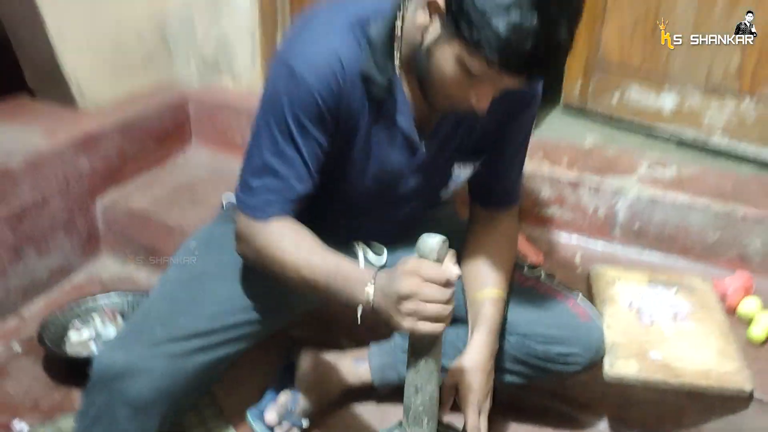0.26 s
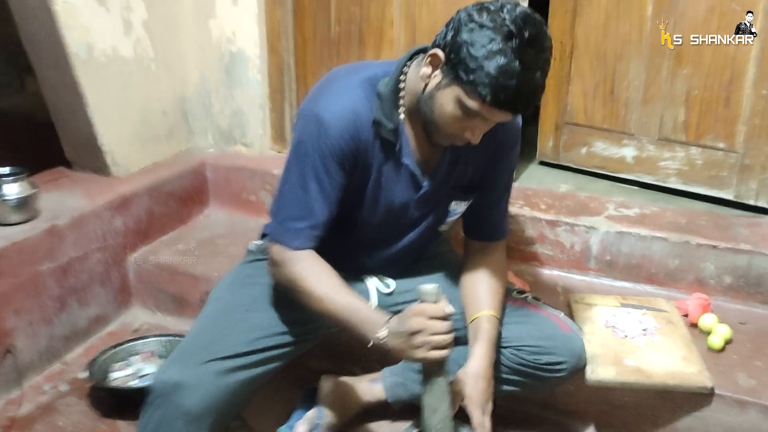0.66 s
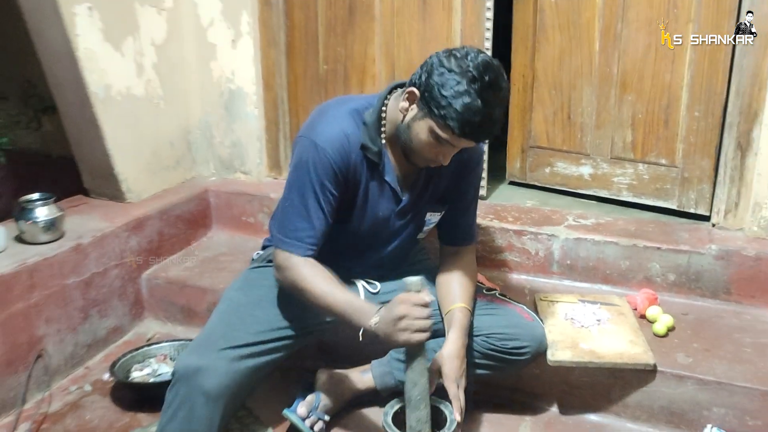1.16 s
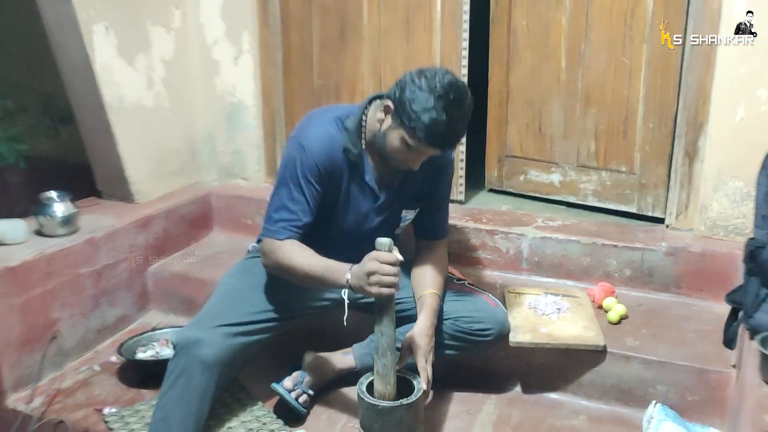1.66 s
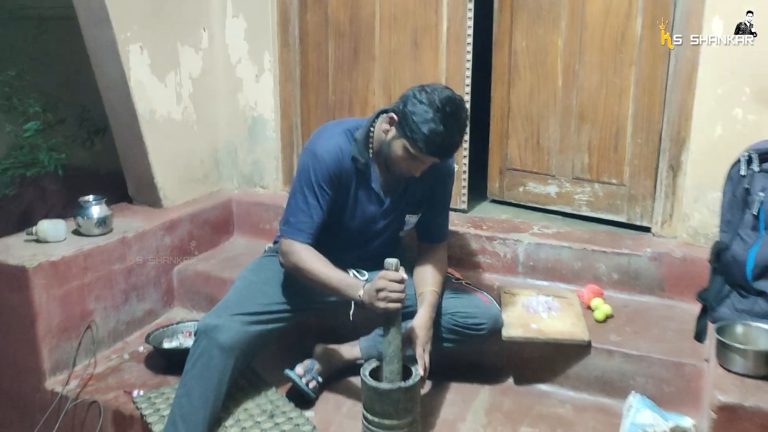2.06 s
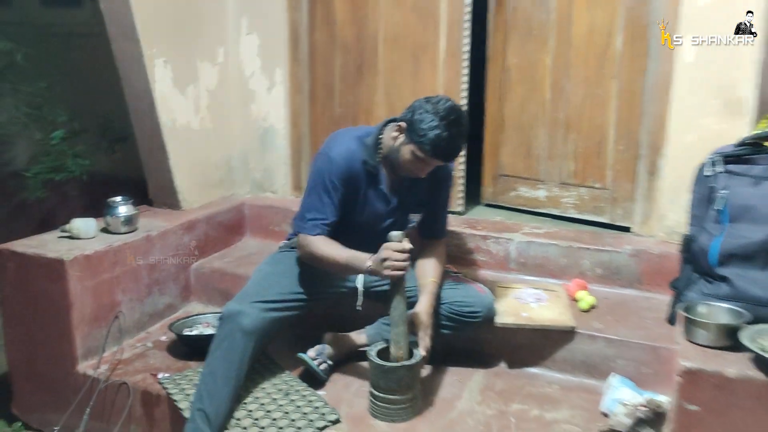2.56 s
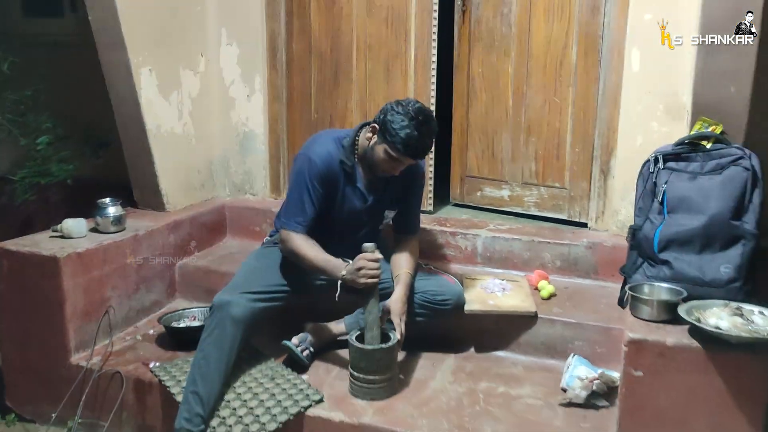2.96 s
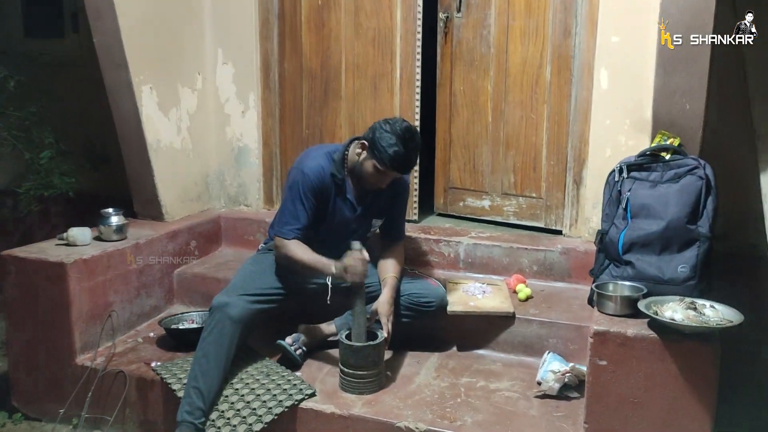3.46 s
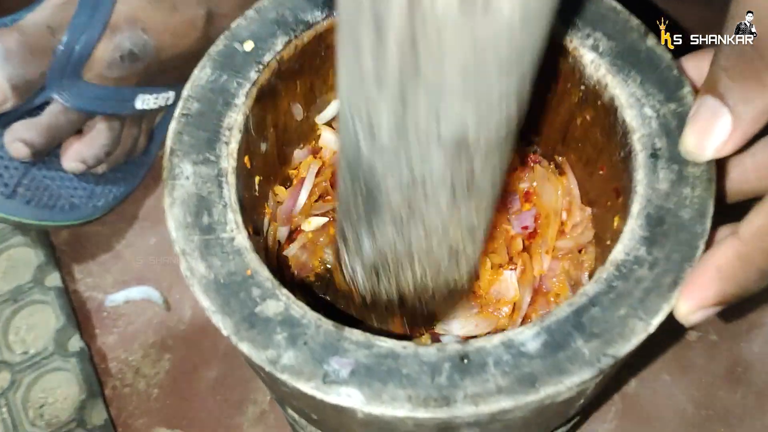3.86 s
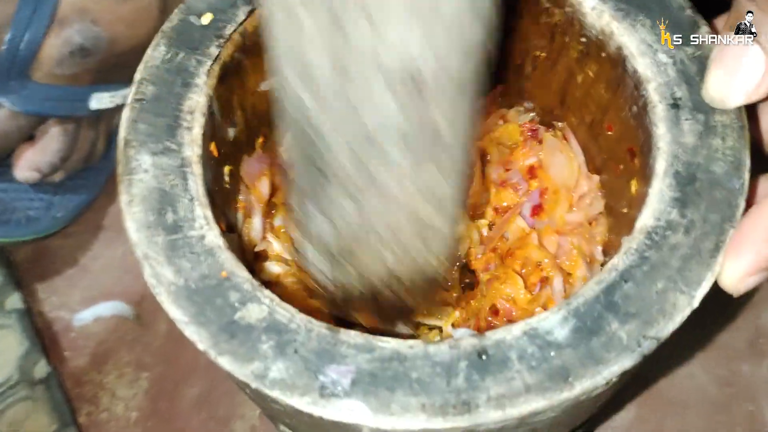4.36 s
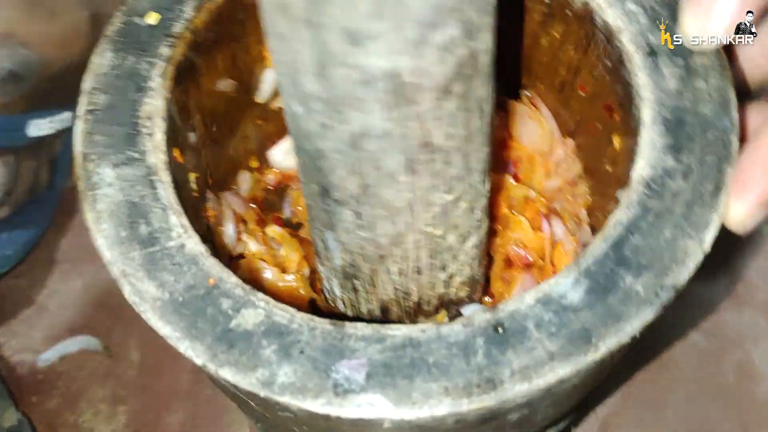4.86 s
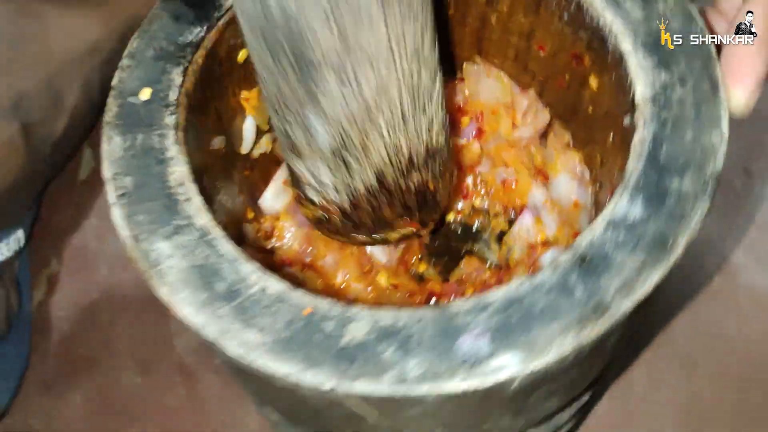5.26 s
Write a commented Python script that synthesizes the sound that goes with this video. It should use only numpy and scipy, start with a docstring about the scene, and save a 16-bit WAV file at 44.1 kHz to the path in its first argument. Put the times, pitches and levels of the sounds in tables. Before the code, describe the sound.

Steady hollow knocks and wet splats of a pestle in a mortar outdoors at night, breaking off briefly and resuming closer and drier.

```python
"""A wooden pestle pounds chillies and onion in a heavy mortar on a doorstep at night, among insects. At first
it is a few steps off: each impact excites the air resonance of the bowl, thumps the step and splats the paste,
and the porch reverberates. Then the scene changes and the blows are right at the bowl, drier and more damped,
with juice squeezed out and faint squeaks between them. Last, the pestle is dragged hard through the paste."""
import sys
import numpy as np
from scipy import signal
from scipy.fft import rfft, irfft
from scipy.io import wavfile
from scipy.ndimage import uniform_filter1d, minimum_filter1d

SR = 44100
rng = np.random.default_rng(int(sys.argv[2]) if len(sys.argv) > 2 else 0)


def wav_out(sig):
    """Save sig, one row per channel (or a flat mono array), as 16-bit PCM at SR to the path in sys.argv[1]."""
    wavfile.write(sys.argv[1], SR, np.round(np.clip(np.atleast_2d(sig).T, -1, 1) * 32767).astype(np.int16))


N = 242991
TIME = np.arange(N) / SR
FAR_UNTIL_S, NEAR_FROM_S = 3.664, 3.91


def amp(db):
    """Amplitude ratio of a level in decibels."""
    return 10 ** (np.asarray(db) / 20)


def unit_rms(x):
    """Normalisation to rms 1."""
    return x / np.sqrt(np.mean(x ** 2) + 1e-20)


def curve_at(points, hz):
    """Interpolation on a logarithmic frequency axis."""
    f, value = np.transpose(points)
    return np.interp(np.log(hz + 1), np.log(f), value)


def add(mix, s, sound):
    """Superposition of a sound on the mix at time s."""
    part = mix[:, max(round(s * SR), 0):][:, :sound.shape[-1]]
    part += sound[..., :part.shape[-1]]


def colour(x, points):
    """Zero-phase filtering by a curve of (f/Hz, gain/dB)."""
    return irfft(rfft(x) * amp(curve_at(points, np.fft.rfftfreq(x.shape[-1], 1 / SR))), x.shape[-1])


def gate(start, end, ramp_s):
    """Trapezoidal envelope."""
    return np.clip(np.minimum(TIME - start, end - TIME) / ramp_s, 0, 1)


def band_noise(hz, width_hz):
    """Narrow-band noise, heard as a fuzzy note."""
    f = np.fft.rfftfreq(N, 1 / SR)
    return unit_rms(irfft(rfft(rng.standard_normal((2, N))) / (1 + (2 * (f - hz) / width_hz) ** 4), N))


# likeness of the two channels: f/Hz, coherence
COHERENCE = [(30, 0.6), (130, 0.98), (300, 0.95), (700, 0.69), (1200, 0.4), (2500, 0.04), (5000, 0),
             (15000, 0)]
def diffuse(x):
    """Partial coherence: two independent channels come to share their bass while the treble stays wide."""
    angle = np.arccos(np.clip(curve_at(COHERENCE, np.fft.rfftfreq(x.shape[-1], 1 / SR)), 0, 1)) / 2
    mid, side = rfft(x) * np.array([np.cos(angle), np.sin(angle)])
    return irfft(np.array([mid + side, mid - side]), x.shape[-1])


# spectrum of still air: f/Hz, relative density/dB
AIR_SPECTRUM = [(25, 19), (55, 0.5), (100, 16), (160, 12), (350, 6), (700, -2.5), (1200, -7.5), (2500, -7),
                (5500, -12.5), (8500, -8.5), (11000, -14), (15000, -13.5)]
def night_air(level_db=-50.5):
    """Stationary ambient noise, strongest in the bass."""
    return amp(level_db) * unit_rms(diffuse(colour(rng.standard_normal((2, N)), AIR_SPECTRUM)))


# cricket trills: start t/s, end t/s, f/Hz, bandwidth/Hz, level/dB, pulse rate/Hz
TRILLS = [(0, .45, 7000, 500, -68, 9), (.7, 3.6, 7850, 300, -72.5, 3.4), (0, 2.1, 8700, 807, -66, 1.7),
          (1.65, 2.2, 9200, 800, -67, 17), (3.15, 3.45, 9440, 350, -67, 42),
          (3.85, 5.15, 5430, 260, -58, 52)]
def crickets():
    """Amplitude modulation of a narrow band makes each trill."""
    out = np.zeros((2, N))
    for start, end, hz, width_hz, db, pulse_hz in TRILLS:
        pulses = unit_rms(2.5 + np.sin(2 * np.pi * (pulse_hz * TIME + rng.random())))
        out += amp(db) * pulses * band_noise(hz, width_hz) * gate(start, end, ramp_s=0.028)
    return out


# first rasp of each call: t/s
CALLS = [.36, .61, 1.65, 2.38, 2.65, 2.95]
def bush_cricket(gap_s=0.073, half_width_s=0.032, left_db=-59, right_db=-69):
    """Paired Gaussian pulses of high noise, placed to the left by a level difference."""
    rasps = sum(np.exp(-((TIME - s - lag) / half_width_s) ** 2) for s in CALLS for lag in (0, gap_s))
    return amp([[left_db], [right_db]]) * rasps * band_noise(12910, width_hz=1800)


# faint squeaks between blows: centre t/s, duration/s, f/Hz, level/dB
SQUEAK_NOTES = [(4.452, 0.043, 1170, -54), (4.52, 0.12, 1187, -58), (4.86, 0.029, 1250, -42)]
def squeaks():
    """Narrow-band noise under a Gaussian envelope gives short, soft notes."""
    return sum(amp(db) * band_noise(hz, width_hz=220) * np.exp(-(2 * (TIME - s) / length) ** 2)
               for s, length, hz, db in SQUEAK_NOTES)


# small sharp ticks: t/s, level before filtering/dB, left minus right/dB
TICK_EVENTS = [(.053, -39, -7.5), (.237, -50, -10.5), (.543, -60, -4), (1.072, -44, 0), (1.826, -42, -10),
               (1.945, -40, -28), (4.273, -43.5, 6), (4.5, -38, -1), (4.581, -41, -8), (4.665, -41, -2),
               (4.944, -34.5, -3), (5.447, -38, 7)]
def ticks(decay_s=0.0015):
    """Broadband transients, heard as thin, dry clicks."""
    out, t = np.zeros((2, N)), np.arange(SR // 50) / SR
    for s, db, pan_db in TICK_EVENTS:
        gains = amp(db + np.array([[pan_db], [-pan_db]]) / 2)
        add(out, s, gains * rng.standard_normal((2, len(t))) * np.exp(-t / decay_s))
    return colour(out, [(150, 3), (1000, 8), (4000, 9), (9000, 8), (15000, 6)])


# echoes from steps and walls: delay t/s, level before filtering/dB
REFLECTIONS = [(.0157, -20), (.0243, -17.5), (.0335, -19), (.0515, -23), (.058, -26), (.108, -30),
               (.147, -32)]
# reverberation time of the porch: f/Hz, T60/s
PORCH_T60 = [(100, 1), (250, 0.67), (700, 1), (2800, 0.7), (4200, 0.35), (14000, 0.084)]
def porch(x, tail_db):
    """Convolution with discrete echoes and a diffuse tail in which each band decays at its own rate."""
    hz, t, noise = signal.stft(rng.standard_normal((2, SR)), SR, nperseg=256)
    envelope = amp(-60 * t / curve_at(PORCH_T60, hz)[:, None]) * (1 - np.exp(-t / 0.023))
    tail = signal.istft(noise * envelope, SR, nperseg=256)[1]
    tail = colour(diffuse(tail / np.linalg.norm(tail[0])),
                  [(150, -5), (350, 1), (700, -11.5), (1200, -1.5), (2600, 4.5), (5000, 5.5), (14000, 4.5)])
    walls = np.zeros_like(tail)
    for delay, db in REFLECTIONS:
        add(walls, delay, amp(db) * np.ones((2, 1)))
    walls = colour(walls, [(200, 5), (900, -5), (3000, -12.5), (10000, -2)])
    return signal.fftconvolve(x, walls + amp(tail_db) * tail, axes=1)[:, :N]


def scattered(x, t, wet_db, fade_s):
    """Scattering by ground, legs and steps adds dense early reflections; rms 1 over the first 40 ms."""
    taps = diffuse(rng.standard_normal((2, len(t))) * np.exp(-t / fade_s) * (1 - np.exp(-t / 0.0079)))
    y = x + amp(wet_db) * signal.fftconvolve(x, taps / np.linalg.norm(taps[0]), axes=1)[:, :len(t)]
    return y / np.sqrt(np.mean(y[:, :SR // 25] ** 2))


def crackle(envelope, spectrum, per_s, spread_db):
    """Shot noise of tiny wet bursts; the envelope sets its amplitude in the treble."""
    sizes = amp(spread_db * np.minimum(rng.exponential(1, N), 4))
    occurs = rng.random(N) < per_s / SR
    bursts = unit_rms(sizes * occurs * rng.standard_normal((2, N)))
    treble_power = np.mean(amp(curve_at(spectrum, np.linspace(4500, 15000, 50))) ** 2) * 10500 / (SR / 2)
    return diffuse(colour(bursts * envelope, spectrum)) / np.sqrt(treble_power)


# strokes through the paste: start t/s, end t/s, treble level/dB
DRAGS = [(-0.04, 0.099, -51.5), (0.394, 0.607, -50), (0.854, 1.025, -46), (1.415, 1.556, -53),
         (1.877, 2.146, -52.5), (2.963, 3.056, -52), (3.507, 3.607, -51), (5.079, 5.316, -39.5),
         (5.275, 5.54, -52), (5.479, 5.6, -23)]
# spectrum of dragged paste: f/Hz, relative density/dB
DRAG_SPECTRUM = [(150, 10.5), (700, 6.5), (1400, 4.5), (1900, 10), (2500, 13), (4200, 8.5), (5800, 1.5),
                 (8500, 8.5), (11000, 3.5), (15000, 1)]
def dragging(clump_db=1.4):
    """Granular friction: the paste rasps in clumps as the pestle is dragged through it."""
    strokes = sum(amp(db) * gate(start, end, ramp_s=0.065) for start, end, db in DRAGS)
    clumps = amp(clump_db * unit_rms(uniform_filter1d(rng.standard_normal(N), size=300)))
    return crackle(strokes * clumps, DRAG_SPECTRUM, per_s=6000, spread_db=2.5)


def surge(s, db, swell_s, fade_s):
    """Exponential growth up to time s and exponential decay after it."""
    return amp(db) * np.exp(-np.maximum((s - TIME) / swell_s, (TIME - s) / fade_s))


# the pestle sinks into a thick lump: t/s, peak treble level/dB
JUICE_SQUEEZES = [(4.102, -25.5), (4.251, -49.5), (4.34, -34.5), (4.611, -29.5), (4.872, -28.5),
                  (5.38, -33.5)]
# spectra of a splat, far and near: f/Hz, relative density/dB
FAR_SPLAT = [(150, -0.5), (600, 29.5), (1300, 6.5), (2500, -2), (4000, 10), (5600, -3), (8500, 3),
             (11000, -0.5), (15000, 3)]
NEAR_SPLAT = [(150, 14.5), (400, -0.5), (750, 26.5), (1250, -8), (1700, 12), (2200, 8), (3000, 15.5),
              (5500, 5.5), (8500, 10.5), (11000, 5.5), (15000, 0.5)]
def splats(blows):
    """Compression expels juice from the skins: a splat at each blow, dry and short near the bowl."""
    far = sum(surge(s, db, swell_s=0.0024, fade_s=0.018) for s, *_, db in blows if s < FAR_UNTIL_S)
    near = sum(surge(s, db, swell_s=0.0015, fade_s=0.0051) for s, *_, db in blows if s > FAR_UNTIL_S)
    juice = sum(surge(s, db, swell_s=0.0067, fade_s=0.013) for s, db in JUICE_SQUEEZES)
    return (crackle(far, FAR_SPLAT, per_s=14000, spread_db=-0.2)
            + crackle(near + juice, NEAR_SPLAT, per_s=8300, spread_db=4))


def ring(modes, t, skew_rad):
    """Damped modes, detuned by where the blow lands, reach the two channels out of phase."""
    hz, db, t60 = np.transpose(modes)[:, :, None]
    detune, skew = rng.standard_normal((2, len(modes), 1))
    phase = 2 * np.pi * hz * (1 + 0.012 * detune) * t
    decay = amp(db - 60 * t / t60)
    return np.array([(decay * np.sin(phase + sign * skew_rad * np.tanh(skew))).sum(0) for sign in (1, -1)])


# spectrum of the mortar on the step, from afar: f/Hz, relative density/dB
STEP_SPECTRUM = [(45, -53.5), (75, -25.5), (100, -14), (140, -10.5), (175, -3.5), (205, 4), (250, 1.5),
                 (340, -2), (450, -3.5), (600, -12.5), (1000, -16), (2000, -72.5)]
def step_thump(t, far):
    """Heavily damped impact of mortar on step: low noise, higher and shorter from close by."""
    spectrum = [(f * (1 if far else 1.15), db) for f, db in STEP_SPECTRUM]
    rumble = diffuse(colour(rng.standard_normal((2, len(t))), spectrum))
    envelope = (1 - np.exp(-t / 0.0023)) * np.exp(-t / (0.017 if far else 0.011))
    return scattered(rumble * envelope, t, wet_db=-20.5, fade_s=0.045)


# modes of the pestle against the mortar wall: f/Hz, relative level/dB, T60/s
CONTACT_MODES = [(1112, 1.5, 0.034), (1290, -2, 0.027), (1578, -3, 0.026), (1699, 1, 0.02),
                 (1900, -17, 0.012), (2303, -2.5, 0.028), (2775, -8.5, 0.051), (2847, -9, 0.024),
                 (3830, -5.5, 0.026), (3970, -12, 0.016), (4200, -42, 0.0051)]
def pestle_clack(t, far, favoured_hz, boost_db=7):
    """Modal excitation of wood on stone: seeds and grit break the contact into tiny impacts."""
    grit_decay = np.exp(-t / 0.0081) + amp(-11 if far else -18) * np.exp(-t / 0.019)
    grit = rng.standard_normal((1, len(t))) * grit_decay
    modes = [(f, db + boost_db * np.exp(-(np.log(f / favoured_hz) / 0.14) ** 2), t60)
             for f, db, t60 in CONTACT_MODES]
    wood = signal.fftconvolve(grit, ring(modes, t, skew_rad=1.05), axes=1)[:, :len(t)]
    noise = colour(rng.standard_normal((2, len(t))),
                   [(400, -7), (1100, 10), (2900, 8), (4300, -11), (6000, -47.5), (15000, -37)])
    crack = diffuse(noise) * np.exp(-t / 0.0092)
    return scattered(unit_rms(wood) + amp(-3) * unit_rms(crack), t, wet_db=-2 if far else -6, fade_s=0.02)


# air modes of the bowl: multiple of its pitch, relative level/dB, share of its T60
CAVITY_MODES = [(1.003, 3, 0.79), (0.828, -4, 0.69), (0.929, -6.5, 1), (1.1, -6, 0.83), (1.25, -11.5, 0.59),
                (1.451, -9.5, 0.6)]
def bowl_knock(t, far, hz, clack_db, usual_clack_db=-21.5, doubling_db=22):
    """Cavity resonance: the air in the bowl rings, longer after a bare contact than a cushioned one."""
    t60 = (0.088 if far else 0.034) * 2 ** ((clack_db - usual_clack_db) / doubling_db)
    modes = [(hz * ratio, db, t60 * share) for ratio, db, share in CAVITY_MODES]
    cushion = 1 - np.exp(-t / 0.0025)  # the paste softens the contact
    hollow = cushion * ring(modes, t, skew_rad=0.38)
    if not far:  # close by, the knock is slightly duller, softened above 1 kHz
        hollow = signal.sosfilt(signal.butter(4, 1000, fs=SR, output="sos"), hollow)
    return scattered(hollow, t, wet_db=-10 if far else -14, fade_s=0.018)


# blows: t/s, knock level/dB, thump re knock/dB, nominal clack re knock/dB, bowl f/Hz, splat level/dB
PESTLE_BLOWS = [(.006, -40.5, -10.5, -3, 619, -59), (.131, -27.5, -7, -13.5, 664, -53),
                (.181, -16.5, -17.5, -17.5, 675, -49), (.398, -46.5, -4, -14.5, 645, -59),
                (.466, -27.5, -9, -20, 686, -37), (.688, -23, -11.5, -11.5, 665, -67),
                (.7004, -21, -46, -40, 652, -66.5), (.734, -20.5, -8, -27.5, 714, -33),
                (.962, -29, -10.5, -18.5, 668, -54.5), (1.0153, -18, -9, -18.5, 709, -36.5),
                (1.3006, -16, -10, -13.5, 719, -45), (1.586, -21.5, -6.5, -17.5, 678.3, -36),
                (1.8832, -16.5, -13.5, -15.5, 708, -40), (2.179, -14, -17.5, -18, 711, -55.5),
                (2.4697, -13.5, -16, -12.5, 719.3, -58), (2.7645, -26.5, -11, -21.5, 699, -42),
                (3.058, -21, -4, -17.5, 711, -43), (3.3479, -17.5, -11, -12, 730, -47.5),
                (3.6245, -15, -17, -14.5, 711.5, -60), (4.0613, -30.5, -8, -12.5, 682, -39),
                (4.112, -21, -9, -16.5, 721, -37), (4.348, -23, -7.5, -26, 772, -45),
                (4.365, -34, -2, -40, 680, -72), (4.608, -27.5, -3, -19, 708, -36.5),
                (4.6256, -23, -7.5, -32, 673, -48), (4.8113, -26, -7.5, -26, 598, -45.5),
                (4.872, -35, -4, -11, 620, -46), (5.0612, -17.5, -14.5, -26.5, 652, -37),
                (5.137, -34, -7, -17, 790, -47), (5.374, -17.5, -4, -20, 673, -24)]
def pounding(clack_lift_db=1):
    """Impact excitation: each blow drives bowl, step and pestle at once, over the sounds of the paste."""
    out = splats(PESTLE_BLOWS) + dragging()
    t = np.arange(SR // 4) / SR
    for s, knock_db, thump_db, clack_db, hz, _ in PESTLE_BLOWS:
        far = s < FAR_UNTIL_S
        favoured_hz = 1400 * (2400 / 1400) ** rng.random()  # the landing point favours one clack mode
        knock = bowl_knock(t, far, hz, clack_db)
        thump = amp(thump_db) * step_thump(t, far)
        clack = amp(clack_db + clack_lift_db) * pestle_clack(t, far, favoured_hz)
        add(out, s, amp(knock_db) * (knock + thump + clack))
    return out


def scene():
    """Direct plus reverberant sound: the reverberant share falls once the listener is at the bowl."""
    mortar = pounding()
    far = TIME < FAR_UNTIL_S
    # successive far blows take turns among four random porch tails, so the reverberation has no fixed tone
    turn = np.searchsorted([s for s, *_ in PESTLE_BLOWS], TIME + 0.01) % 4
    far_reverb = sum(porch(mortar * far * (turn == k), tail_db=-23) for k in np.unique(turn))
    near_reverb = amp(-7.5) * porch(mortar * ~far, tail_db=-23.5)
    pounded = mortar + far_reverb + near_reverb
    return pounded + ticks() + squeaks() + night_air() + crickets() + bush_cricket()


def limiter(x, ceiling_db=-6, recovery_db_per_s=299):
    """Peak limiting: the gain drops for the hardest blows and recovers quickly."""
    over_db = np.maximum(20 * np.log10(abs(x).max(0) + 1e-9) - ceiling_db, 0)
    recovery_db = TIME * recovery_db_per_s
    gain_db = recovery_db - np.maximum.accumulate(over_db + recovery_db)
    return x * amp(uniform_filter1d(minimum_filter1d(gain_db, size=65), size=65))


# unequal response of the two microphones: f/Hz, left minus right/dB
MIC_BALANCE = [(100, -0.5), (700, 0), (1200, -1), (2200, 0), (6500, 4.5), (7800, 0), (8900, -9), (9900, -7),
               (11300, 1.5), (14500, 4.5)]
def record(dry, low_hz=80, high_hz=15600, fade_in_s=0.13):
    """Signal chain: bass cut, a silent break with a fade back in, microphone colour, limiter, low-pass."""
    thinned = signal.sosfilt(signal.butter(3, low_hz, "highpass", fs=SR, output="sos"), dry)
    gain = (TIME < FAR_UNTIL_S) + np.clip((TIME - NEAR_FROM_S) / fade_in_s, 0, 1)
    sides = [colour(x, [(hz, sign * db / 2) for hz, db in MIC_BALANCE])
             for x, sign in zip(thinned * gain, (1, -1))]
    low_pass = signal.firwin(401, high_hz, window=("kaiser", 8), fs=SR)
    return signal.oaconvolve(limiter(np.array(sides)), low_pass[None], "same")


dry = scene()
out = record(dry)
wav_out(out)
```